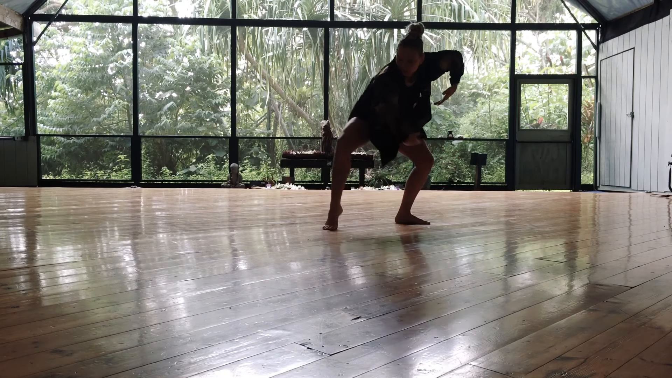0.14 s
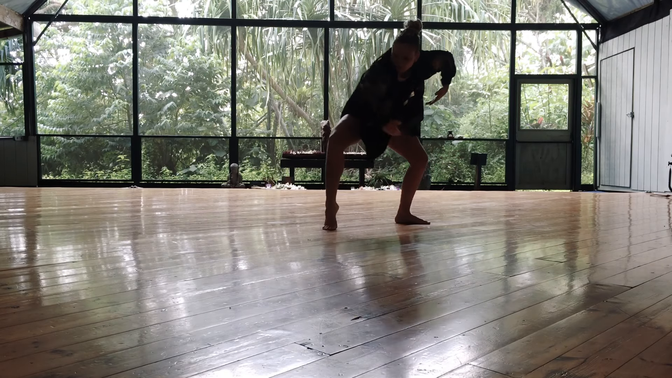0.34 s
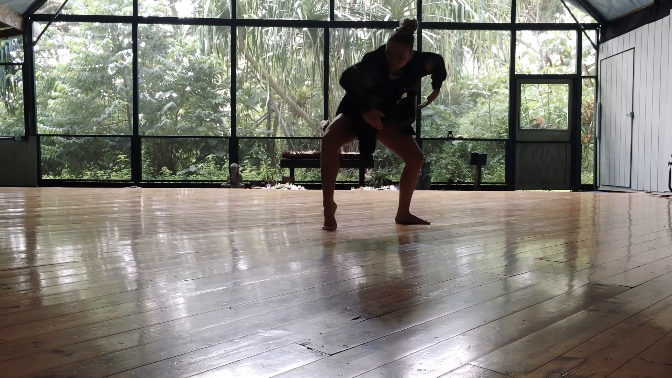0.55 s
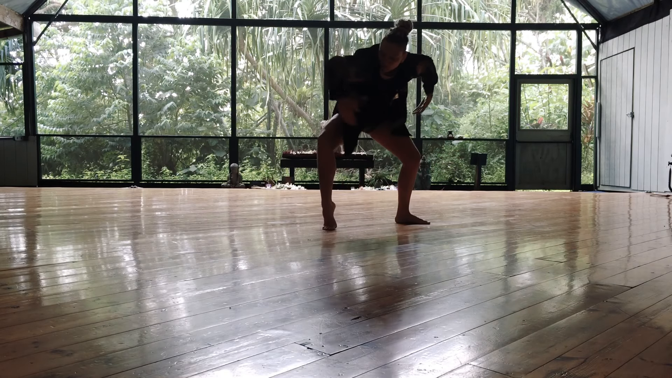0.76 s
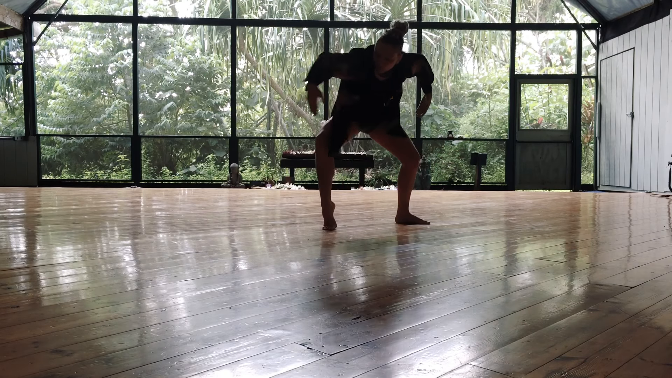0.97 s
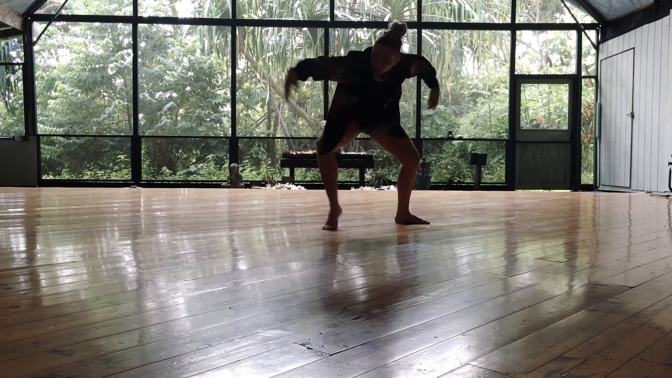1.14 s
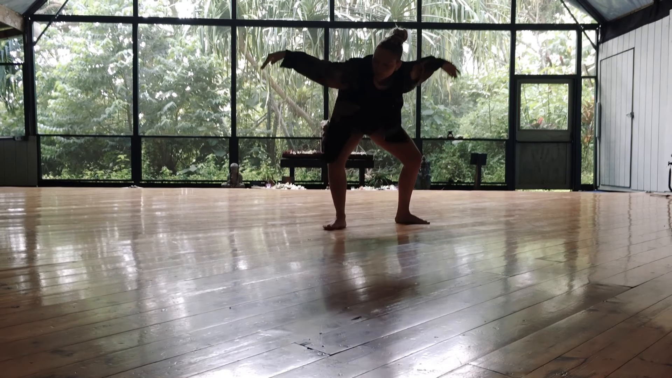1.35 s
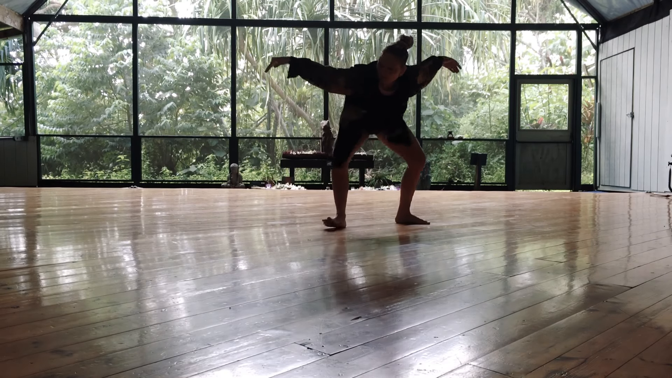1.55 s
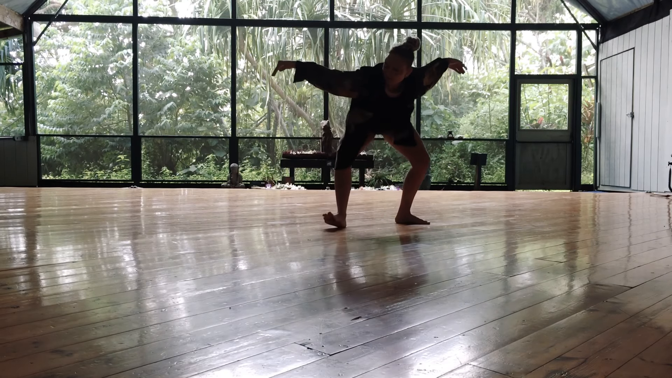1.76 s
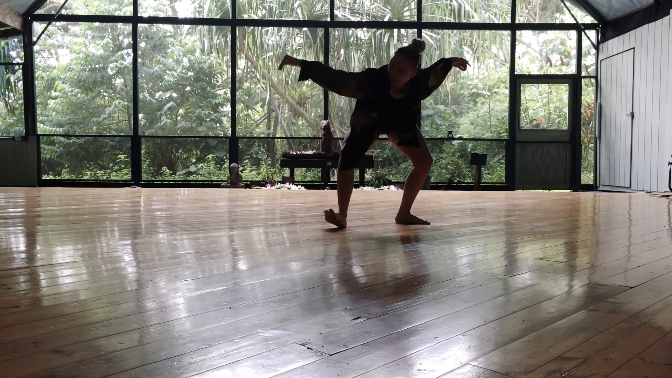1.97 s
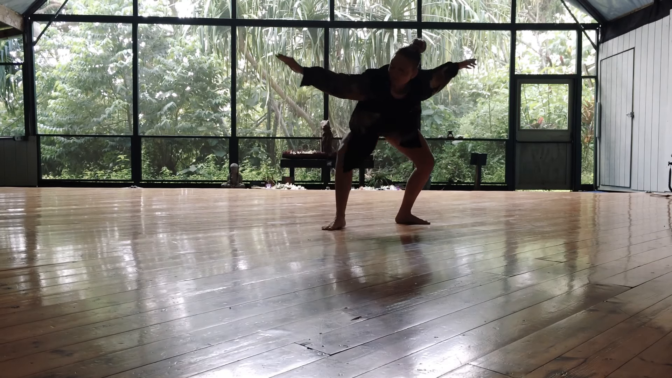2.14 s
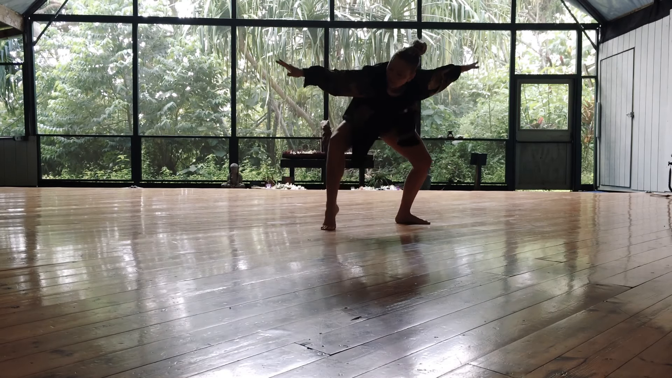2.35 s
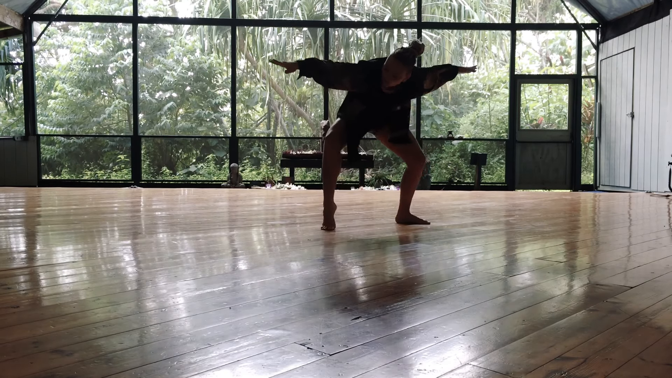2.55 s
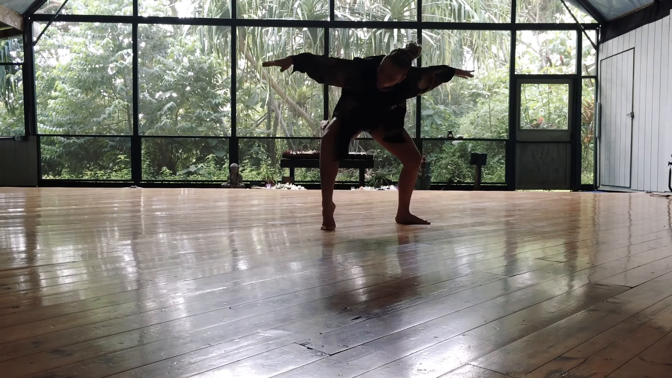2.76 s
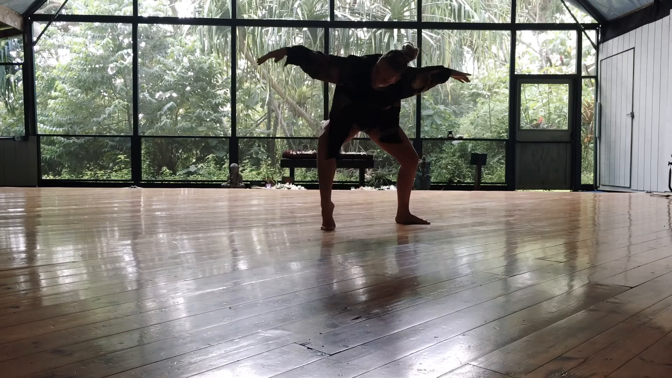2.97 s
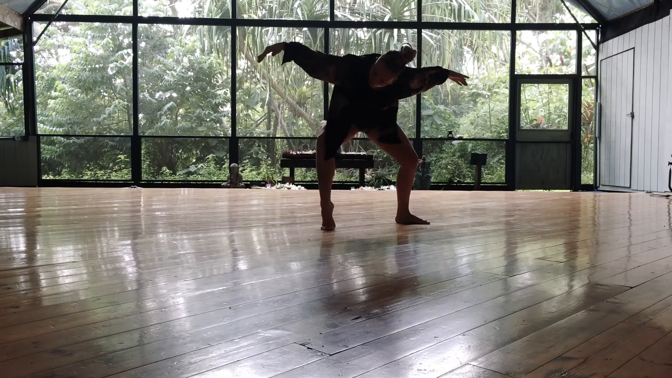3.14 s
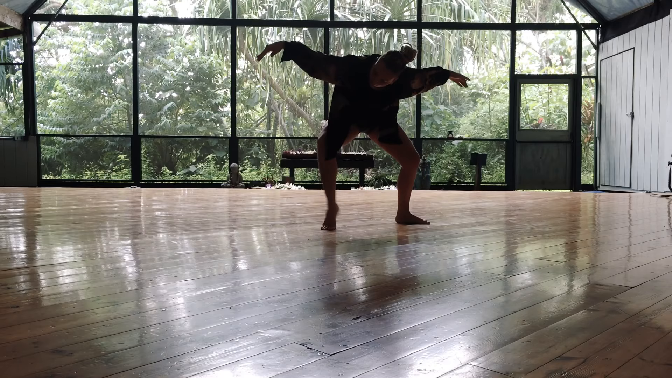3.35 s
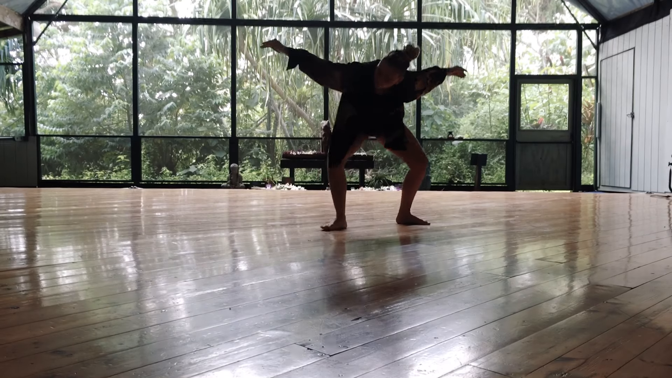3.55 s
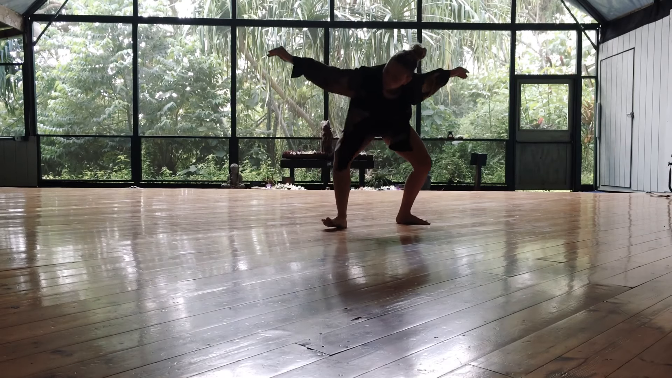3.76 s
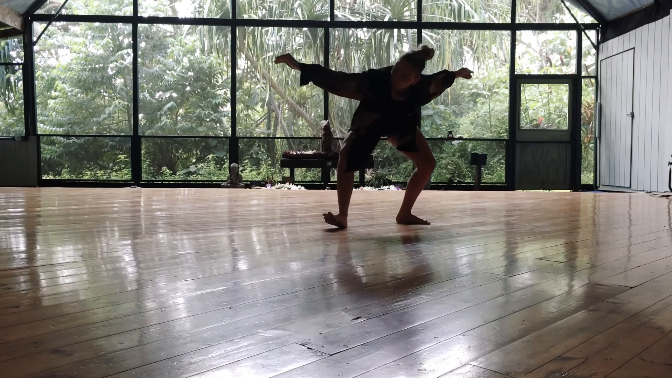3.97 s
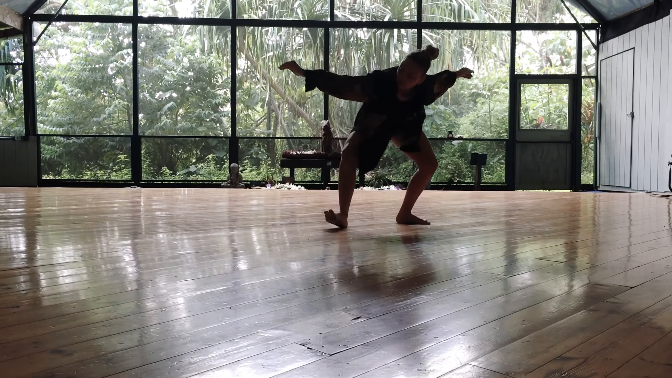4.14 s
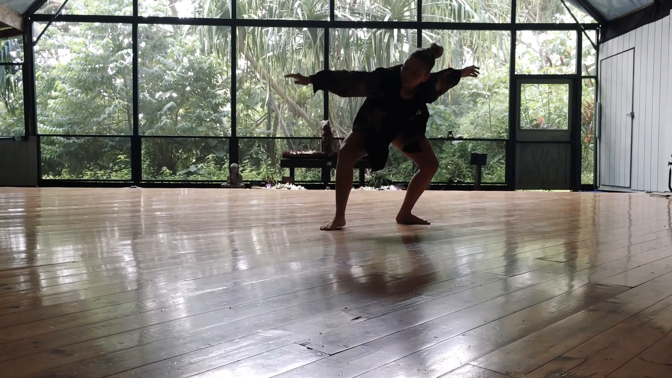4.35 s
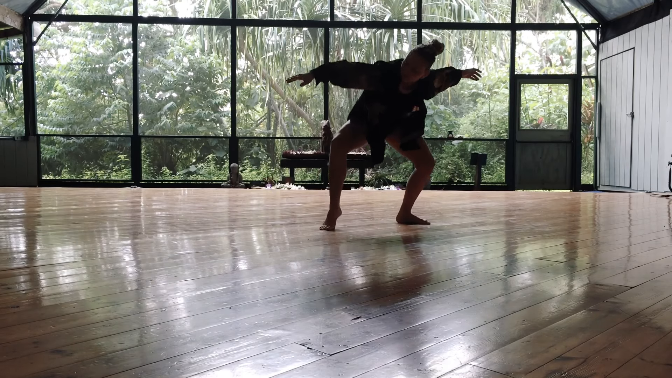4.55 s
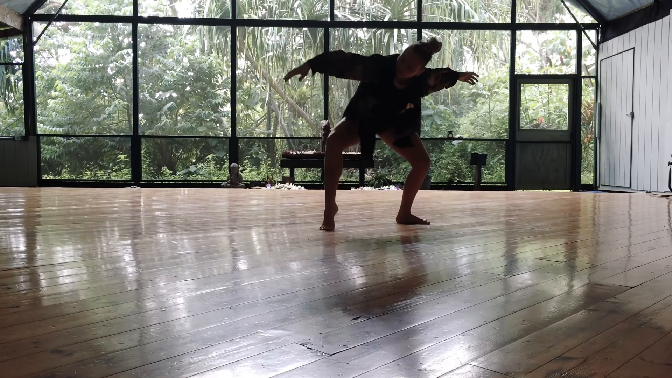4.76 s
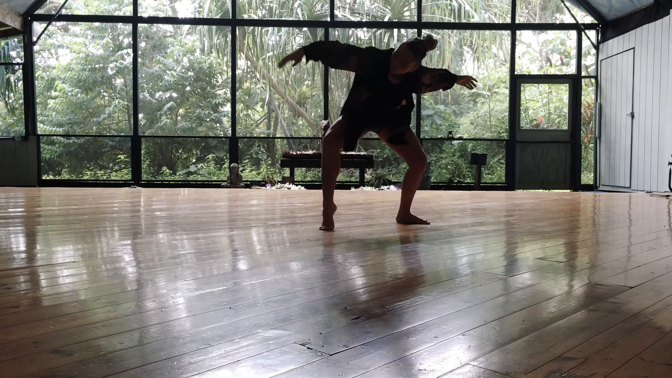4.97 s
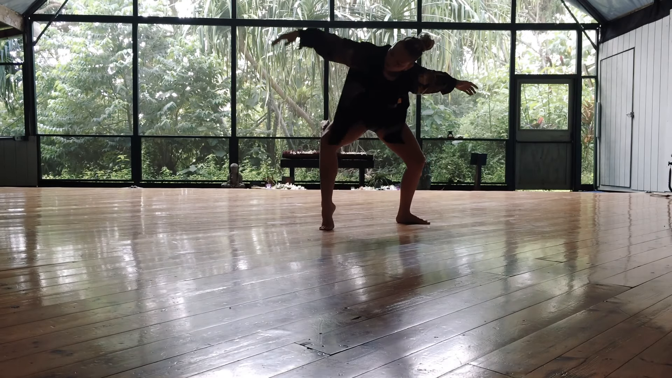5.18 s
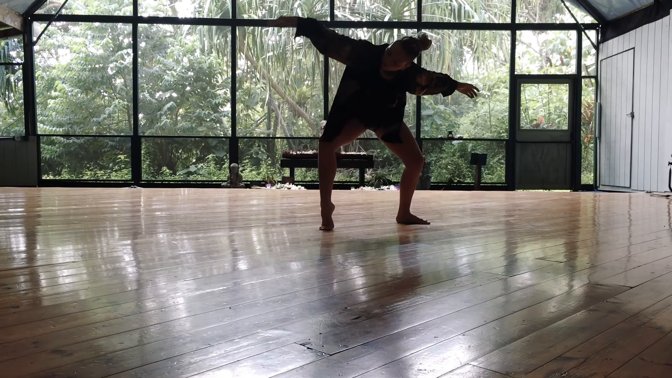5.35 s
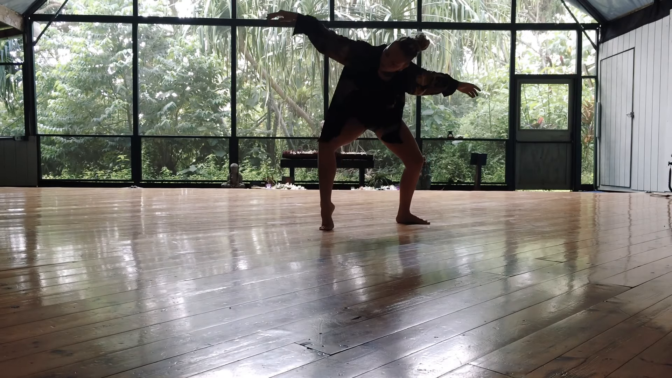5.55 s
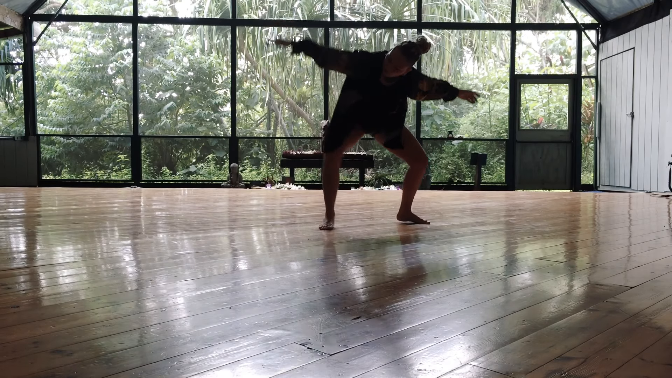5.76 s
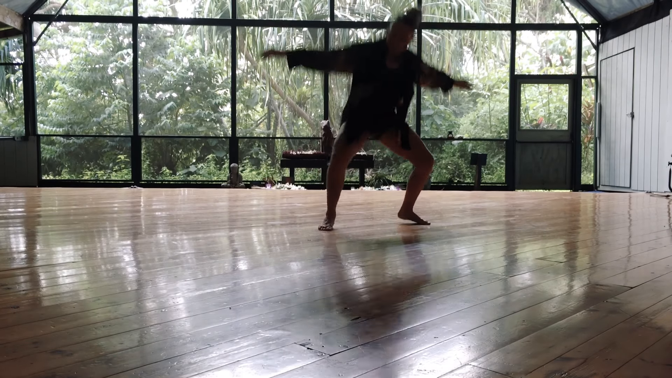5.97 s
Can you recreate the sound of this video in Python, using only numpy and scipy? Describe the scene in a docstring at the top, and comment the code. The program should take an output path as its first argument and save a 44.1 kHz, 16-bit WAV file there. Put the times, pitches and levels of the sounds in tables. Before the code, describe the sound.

A low distant rumble and faint, high insect buzzing run throughout, the nearest insect swelling in three phrases, around 0.4 to 1.5 seconds, 1.9 to 3.5, and 4.1 to the end. Right at the start, a bare toe flicks a sprung wooden floor with a bright snap. At 1.3 seconds a bare foot stamps, a fleshy slap with a low boom from the boards. A duller toe flick sets a board ringing at 2.2 seconds. The loudest sound comes at 3.5 seconds: a heavy, tight stamp that booms through the floor, with a tick of skin on varnish. Another toe snap follows at 4.4 seconds. Near 5.8 seconds a faint toe tap leads straight into a softer stamp at 5.9. Each contact flutters quickly between floor and roof, then dies away in the screened pavilion within about a second.

```python
"""Over a low distant rumble and insects buzzing in the trees, bare toes flick onto a sprung board floor.
Each flick snaps and sets a board ringing. Every contact flutters between the floor and the pitched roof
of a screened pavilion, then dies away in the hall. Three times the dancer stamps: the ball lands first,
arch and heel follow in either order, the floor booms on its joists and skin ticks on the varnish."""
import sys
import numpy as np
from scipy import signal
from scipy.fft import rfft, irfft, next_fast_len
from scipy.io import wavfile

SR = 44100
rng = np.random.default_rng(int(sys.argv[2]) if len(sys.argv) > 2 else 0)


def pcm_store(signal):
    """Save signal as 16-bit PCM."""
    levels = np.round(np.clip(np.atleast_2d(signal), -1, 1) * 32767)
    wavfile.write(sys.argv[1], SR, levels.astype(np.int16).T)


N = 265041
T = np.arange(N) / SR


def from_db(db):
    """Decibels to gain."""
    return 10 ** (np.asarray(db) / 20)


def rms_one(x):
    """Scale to unit rms."""
    return x / np.sqrt(np.mean(x ** 2) + 1e-20)


def at_hz(points, hz, column=1):
    """Read one column of a table on a log-frequency axis."""
    table = np.array(points)
    return np.interp(np.log(hz + 1e-9), np.log(table[:, 0]), table[:, column])


def butter(x, hz, kind):
    """Second-order Butterworth filter."""
    return signal.sosfilt(signal.butter(2, hz, kind, fs=SR, output="sos"), x + 1e-18)


def noise(gain_at):
    """Unit-rms noise through an EQ curve."""
    size = next_fast_len(N, True)
    hz = np.arange(size // 2 + 1) * SR / size
    return rms_one(irfft(rfft(rng.standard_normal(size)) * gain_at(hz), size)[:N])


def burst(t, rise_s, decay_s):
    """Envelope that swells up to t = 0 and then dies."""
    return np.exp(-np.minimum(np.where(t < 0, -t / rise_s, t / decay_s), 40))


def ring(drive, modes):
    """A bank of resonators in parallel."""
    out = np.zeros(N)
    for hz, width_hz, db in modes:
        r, w = np.exp(-np.pi * width_hz / SR), 2 * np.pi * hz / SR
        mode = signal.lfilter([1, 0, -1], [1, -2 * r * np.cos(w), r * r], drive + 1e-18)
        out += from_db(db) * (1 - r * r) / 2 * mode
    return out


def patter(start_s, rise_s, decay_s, eq, tilt_db=0, crack=0, size=8192, passes=3):
    """A dense cluster of tiny impacts, tilted by tilt_db per octave; one sharp crack may stand out."""
    lead = size // 8
    envelope = burst((np.arange(size) - lead) / SR, rise_s, decay_s)
    grains = rng.standard_normal(size) * envelope
    grains[lead] += crack * np.sqrt(np.sum(grains ** 2))
    for _ in range(passes):   # flatten the spectrum so the cluster has no pitch
        flat = irfft(np.exp(1j * np.angle(rfft(grains))))
        grains = flat * np.minimum(3 * envelope, 1)
    hz = np.maximum(np.arange(size // 2 + 1) * SR / size, 1)
    octaves = np.log2(np.maximum(hz / eq[0][0], 1))
    grains = irfft(rfft(grains) * from_db(at_hz(eq, hz) + tilt_db * octaves))
    out, start = np.zeros(N + 2 * size), round(start_s * SR)
    out[start:start + size] = rms_one(grains) * np.sqrt(np.mean(envelope ** 2))
    return out[lead:lead + N]


# Bass-heavy outdoor bed: freq_hz, gain_db
RUMBLE_EQ = [(20, -23), (32, -11), (45, -8), (66, 3), (120, .5), (195, -2.5), (260, -11.5), (500, -18),
             (1000, -22), (2000, -30.5), (3000, -36.5), (5000, -39.5), (8000, -43.5), (15000, -49)]
def rumble(level_db=-51):
    """Steady, dark noise from far outside."""
    return from_db(level_db) * noise(lambda hz: from_db(at_hz(RUMBLE_EQ, hz)))


def buzz(bands):
    """Insect song, blurred by distance into narrow bands of noise."""
    def gain_at(hz):
        return np.sqrt(sum(from_db(db) ** 2 / width / (1 + ((hz - pitch) / width * 1.4) ** 2) ** 2
                           for pitch, width, db in bands))
    return noise(gain_at)


# Voices of the near insect and the far chorus: pitch_hz, width_hz, gain_db
SINGER_BANDS = [(6300, 30, -1), (6020, 56, -4), (6390, 65, -3), (6310, 280, 0.5)]
CHORUS_BANDS = [(5990, 260, 0)]
# Where the near insect holds full level: start_s, end_s
SINGER_PHRASES = [(0.42, 1.49), (1.89, 3.52), (4.07, 6.01)]
def insects(song_db=-69.5, rest_db=-83, chorus_db=-77.5, pulse_hz=66.4, depth=0.13):
    """One throbbing singer swells and fades in long phrases over a steady chorus."""
    swell_db_per_s, fade_db_per_s = 105, 60
    phrases_db = [song_db - swell_db_per_s * np.maximum(start - T, 0)
                  - fade_db_per_s * np.maximum(T - end, 0) for start, end in SINGER_PHRASES]
    level = from_db(np.maximum(np.max(phrases_db, axis=0), rest_db))
    phase = 2 * np.pi * pulse_hz * T
    throb = 1 + depth * (np.cos(phase) + np.cos(2 * phase))
    return level * throb * buzz(SINGER_BANDS) + from_db(chorus_db) * buzz(CHORUS_BANDS)


# Bright snap of a toe: freq_hz, gain_db
SNAP_EQ = [(250, -4), (450, -1.5), (800, 2.5), (1200, 3), (2000, 3.5), (3100, -4.5), (4200, -2), (6000, -3),
           (9000, -3), (15000, -5.5)]
# Ring of a single board: pitch_hz, width_hz, gain_db
BOARD_RING = [(1530, 210, 2), (1790, 170, 0), (2040, 96, 6)]
# Toe cues: start_s, push_db, snap_db, tilt_db_per_octave, ring_trim_db, pocket_hz
TOE_FLICKS = [(0.0381, -24.5, -28.5, 0.8, -7, 2430), (2.203, -26.5, -36, -1.3, 6, 1130),
              (4.3757, -26, -33, -0.8, -0.5, 3740), (5.833, -42, -39, -5, -4, 1080)]
def toes(edge_s=0.00073, pocket_width_hz=380, pocket_db=3, knock_over_snap_db=24.5):
    """Brief suction, then a pressure step and a snap; the board and the air under the toes ring."""
    out = np.zeros(N)
    for start_s, push_db, snap_db, tilt_db, ring_trim_db, pocket_hz in TOE_FLICKS:
        t = T - start_s + edge_s
        push = from_db(push_db) * np.tanh(t / edge_s) * burst(t, rise_s=0.0017, decay_s=0.0016)
        crack = from_db(-0.7 + 1.8 * tilt_db)   # brighter snaps crack harder
        snap = from_db(snap_db) * patter(start_s, 0.0013, 0.0014, SNAP_EQ, tilt_db, crack, passes=1)
        pocket = ring(snap, [(pocket_hz, pocket_width_hz, pocket_db)])
        knock_db = snap_db + knock_over_snap_db + ring_trim_db
        knock = from_db(knock_db) * signal.unit_impulse(N, round(start_s * SR))
        out += push + snap + pocket + ring(knock, BOARD_RING)
    return out


# Boom of the sprung floor: pitch_hz, width_hz, gain_db
FLOOR_BOOM = [(49, 12, 5.5), (65, 11, 3), (103, 17, -5.5), (133.6, 16, -9), (183, 24, -8), (332.5, 12.6, 2),
              (355, 9.7, -7), (494, 19, -1), (562, 11, -12)]
def floor(contacts, low_cut_hz=31):
    """The floor booms on its joists; a low cut removes the deepest bass."""
    return butter(contacts + ring(contacts, FLOOR_BOOM), low_cut_hz, "high")


# Tone of the scatter off the roof ribs: freq_hz, gain_db
ROOF_EQ = [(150, -12), (500, -4.5), (1000, 2), (2000, 2), (5000, 2.5), (15000, -6.5)]
def roof_flutter(first_s=0.0209, bass_trip_s=0.0356, treble_trip_s=0.0323, bass_below_hz=410):
    """Floor-to-roof echo response: treble smears at the rafters, bass bounces off the roof above."""
    bass_db, bass_loss_db, treble_db, treble_loss_db = -5.5, 11, -7, 4.5
    bass, treble = np.zeros((2, SR))
    for trip in range(5):
        bass[round((first_s + trip * bass_trip_s) * SR)] += from_db(bass_db - trip * bass_loss_db)
        delay_s = first_s + trip * treble_trip_s
        smear_s = 0.0054 + trip * 0.00067
        ribs = patter(delay_s, 0.001, smear_s, ROOF_EQ, tilt_db=-3 * delay_s)[:SR]
        focus_db = 2.5 * (trip == 1)   # the pitched roof focuses the second return
        treble += from_db(treble_db - trip * treble_loss_db + focus_db) * rms_one(ribs) / np.sqrt(SR)
    return butter(bass, bass_below_hz, "low") + treble


# Reverb of the hall: freq_hz, level_db, t60_s
HALL_REVERB = [(60, -13.5, 0.23), (168.9, -13, 0.33), (340, -7, 0.43), (606, -6, 0.64), (1090, -3, 0.83),
               (2000, -3, 1.0), (2780, -6, 1), (4160, -2, 1), (8100, -7.5, 0.99), (15000, -14, 0.52)]
def hall_tail(build_s=0.03):
    """Diffuse response that builds up, then dies at its own rate in each band."""
    t, tail = T[:SR], np.zeros(SR)
    edges = np.geomspace(40, 17000, 25)
    for low, high in zip(edges, edges[1:]):
        hz = np.sqrt(low * high)
        dying = 1e-3 ** (t / at_hz(HALL_REVERB, hz, column=2))
        envelope = dying * (1 - np.exp(-(t / build_s) ** 2))
        wash = rms_one(envelope * butter(rng.standard_normal(SR), [low, high], "band"))
        tail += from_db(at_hz(HALL_REVERB, hz)) * wash * np.sqrt(2 * (high - low)) / SR
    return tail


# Fleshy slap of the sole: freq_hz, gain_db
SLAP_EQ = [(150, 0.5), (250, 1.5), (330, 4), (430, 1), (600, 1), (780, -3), (1200, -4.5), (1800, -10.5),
           (3000, -20.5), (6000, -30.5), (15000, -40)]
def landing(start_s, thump_db, contact_s, slap_db, decay_s, tilt_db=0, rise_s=0.0031):
    """The floor dips, stops and springs back under a bell-shaped force while the sole slaps it."""
    u = (T - start_s) / contact_s
    thump = (1 - u ** 2) * np.exp(-np.minimum(u ** 2 / 2, 40))
    slap = patter(start_s, rise_s, decay_s, SLAP_EQ, tilt_db)
    return from_db(thump_db) * thump + from_db(slap_db) * slap


# Stamp cues: start_s, thump_db, slap_db, arch_vs_ball_db, roll_s, heel_thump_db, heel_slap_db, skid_db
FOOT_STAMPS = [(1.3041, -14.5, -31, -12, 0.0315, -20, -43, -35),
               (3.5204, -4, -19, -13.5, 0.0067, -40, -23.5, -32),
               (5.8951, -16, -30.5, -22, 0.0241, -35, -31.5, -41.5)]
def stamps(arch_lag_s=0.0128):
    """The ball lands first; arch and heel follow within hundredths of a second, in either order."""
    out = np.zeros(N)
    for start_s, thump_db, slap_db, arch_db, roll_s, heel_db, heel_slap_db, _ in FOOT_STAMPS:
        force = from_db(thump_db)
        contact_s = 0.0015 / force ** 0.19   # harder stamps are tighter
        ball = landing(start_s, thump_db, contact_s, slap_db, decay_s=0.0059 / force ** 0.52)
        arch = landing(start_s + arch_lag_s, thump_db, contact_s, slap_db - 3, decay_s=0.02, tilt_db=2.7)
        heel_contact_s, heel_decay_s = 0.087 * roll_s, 0.33 * roll_s   # a slow roll softens the heel
        heel = landing(start_s + roll_s, heel_db, heel_contact_s, heel_slap_db, heel_decay_s, tilt_db=0.5)
        out += ball + from_db(arch_db) * arch + heel
    return out


# Tick of skin on varnish: freq_hz, gain_db
SKIN_EQ = [(500, 10), (3000, -7), (9000, -10), (15000, -17)]
def skin(touch_lead_s=0.0086, skid_lag_s=0.0255, rise_s=0.00021):
    """Skin touches ahead of each stamp and skids as the weight settles; a toe peels before the last."""
    # start_s, level_db, decay_s
    touches = [(start_s - touch_lead_s, -37, 0.0018) for start_s, *_ in FOOT_STAMPS]
    skids = [(start_s + skid_lag_s, skid_db, 0.0052) for start_s, *_, skid_db in FOOT_STAMPS]
    peel = (5.8115, -45, 0.0009)
    return sum(from_db(level_db) * patter(start_s, rise_s, decay_s, SKIN_EQ)
               for start_s, level_db, decay_s in touches + skids + [peel])


def scene():
    """Mono mix: feet and their echoes, with the outdoors coming through the screens."""
    feet = floor(stamps() + toes()) + skin()
    echoes = signal.fftconvolve(feet, roof_flutter() + hall_tail())[:N]
    return (feet + echoes + insects() + rumble())[None]


def record(dry, high_cut_hz=15400):
    """A steep high cut on the whole mix."""
    return signal.sosfilt(signal.ellip(10, .1, 80, high_cut_hz, fs=SR, output="sos"), dry)


dry = scene()
out = record(dry)
pcm_store(out)
```